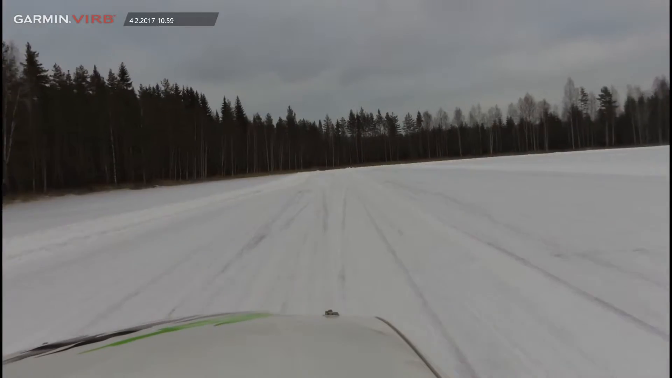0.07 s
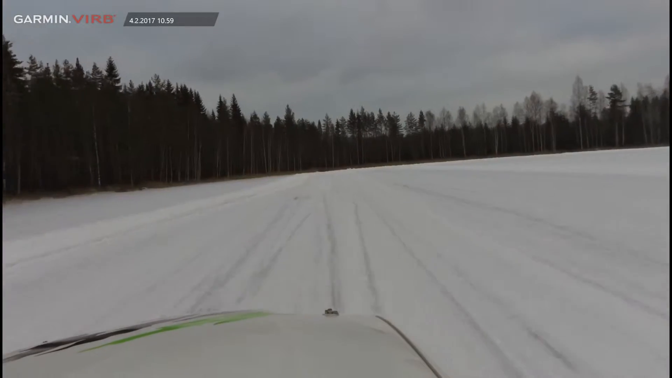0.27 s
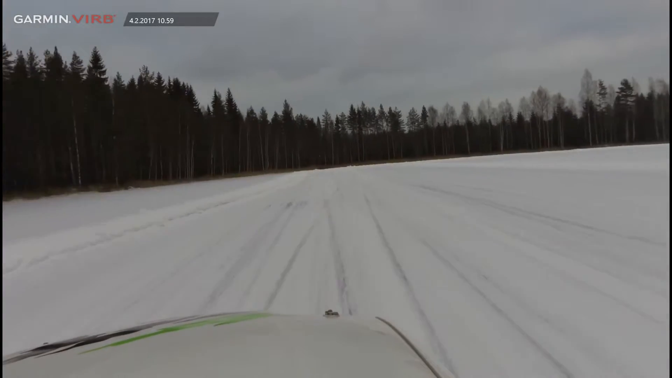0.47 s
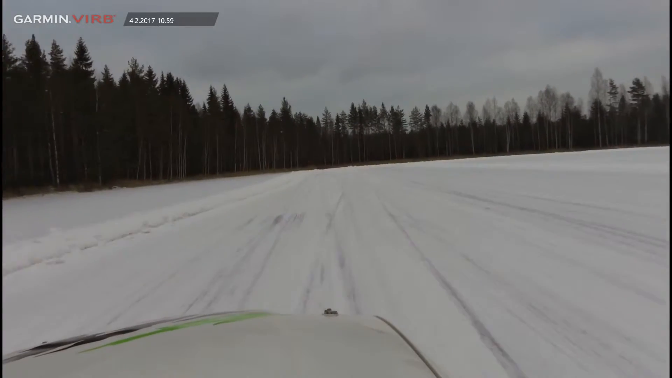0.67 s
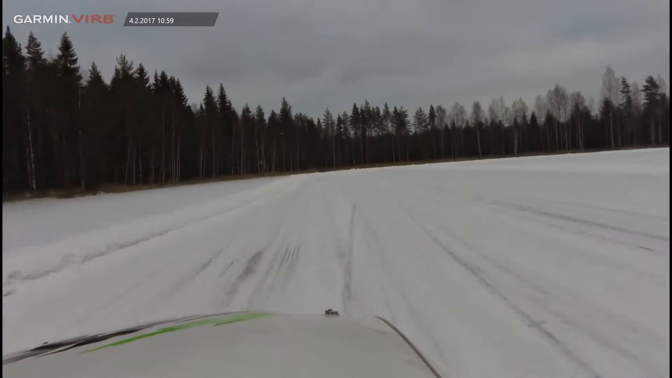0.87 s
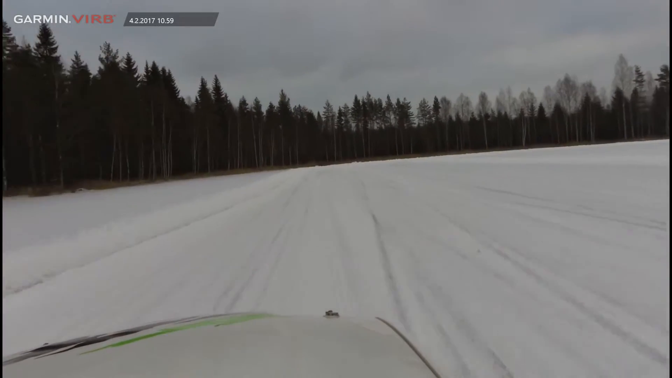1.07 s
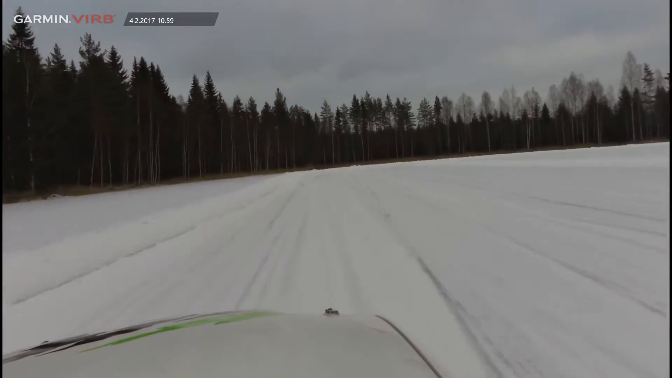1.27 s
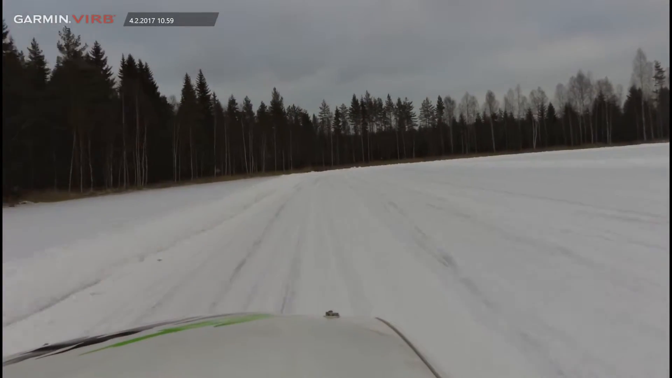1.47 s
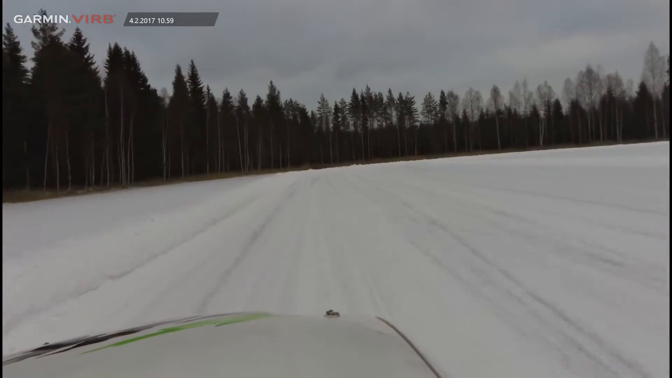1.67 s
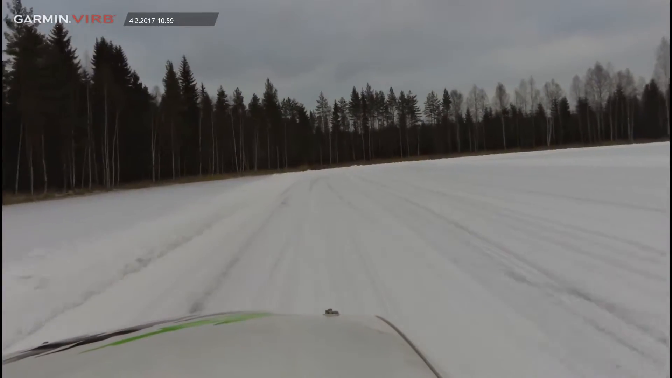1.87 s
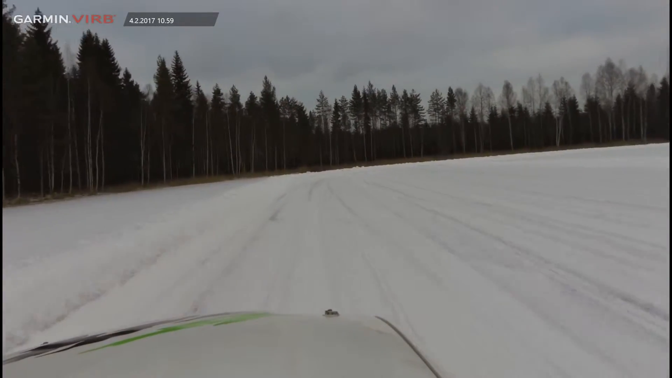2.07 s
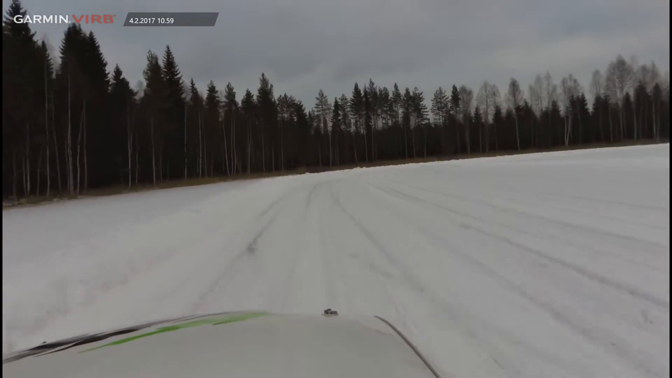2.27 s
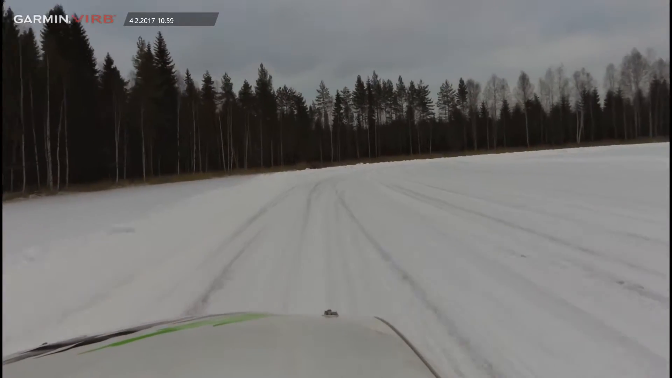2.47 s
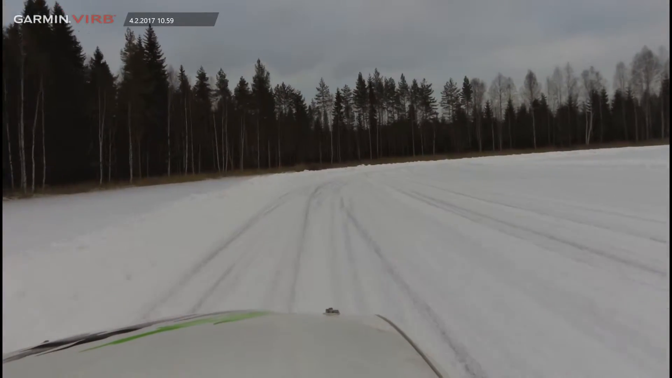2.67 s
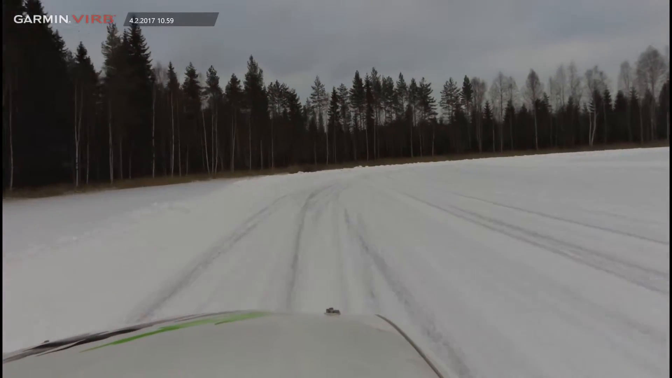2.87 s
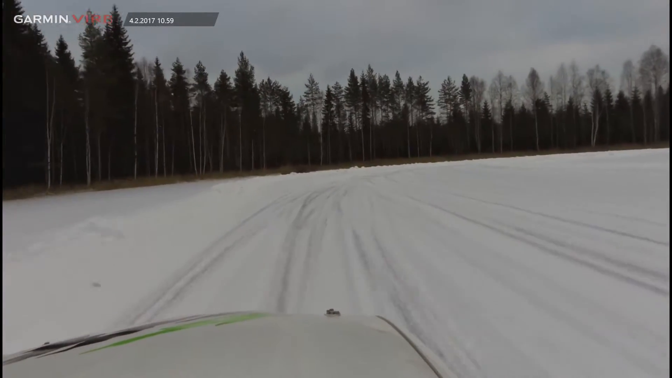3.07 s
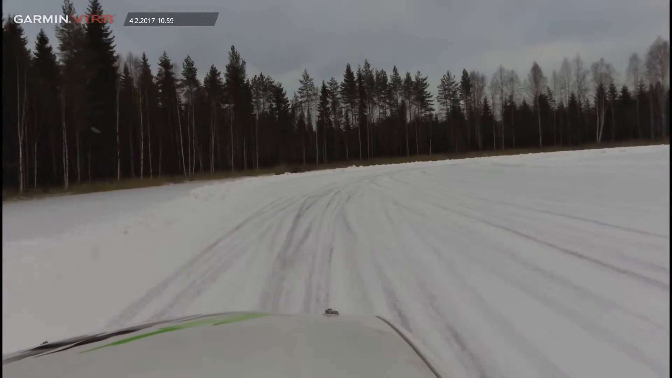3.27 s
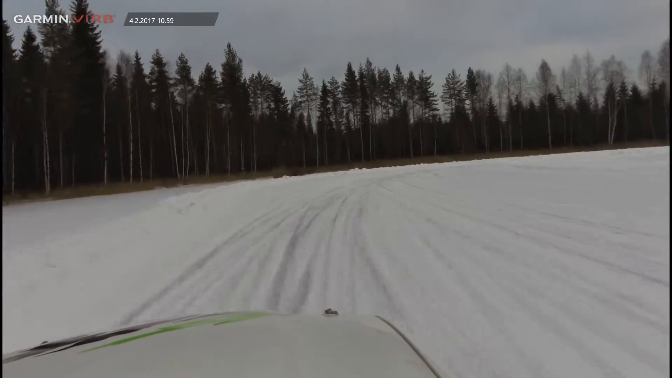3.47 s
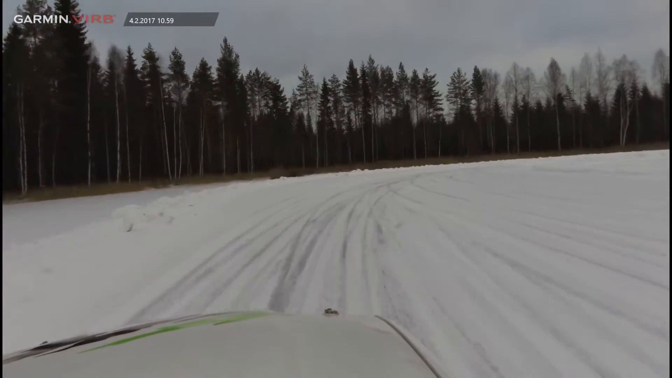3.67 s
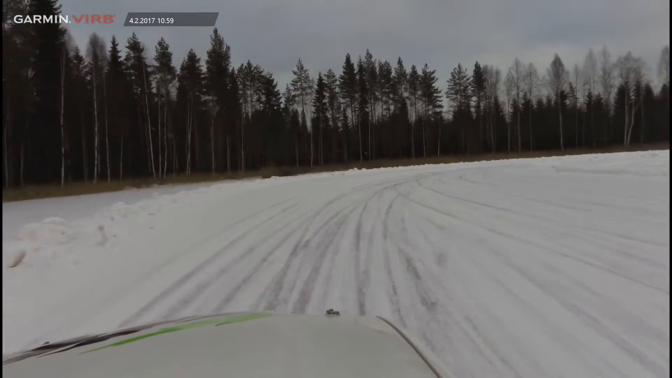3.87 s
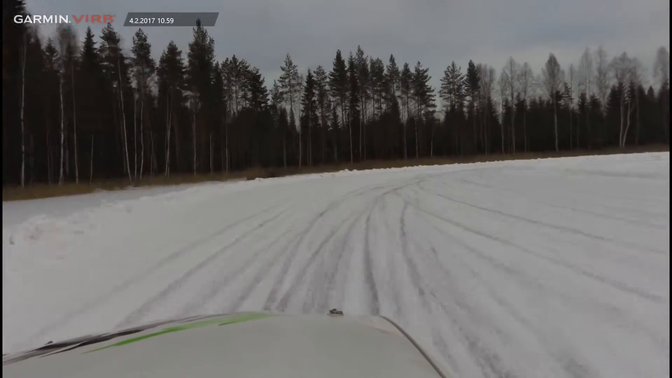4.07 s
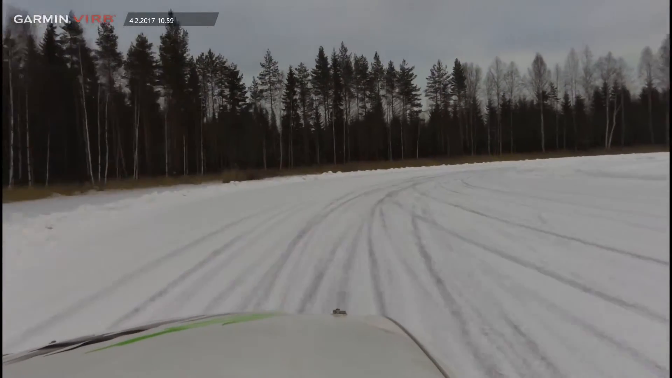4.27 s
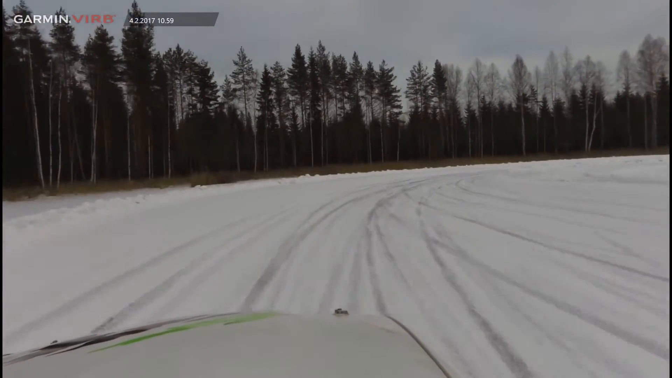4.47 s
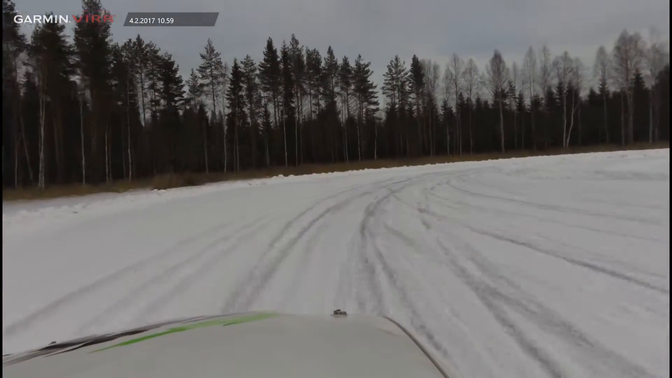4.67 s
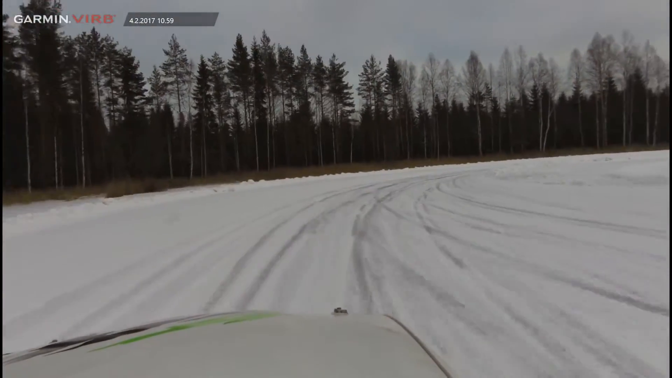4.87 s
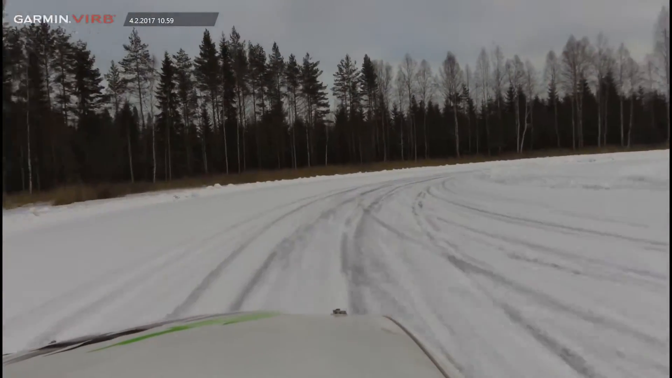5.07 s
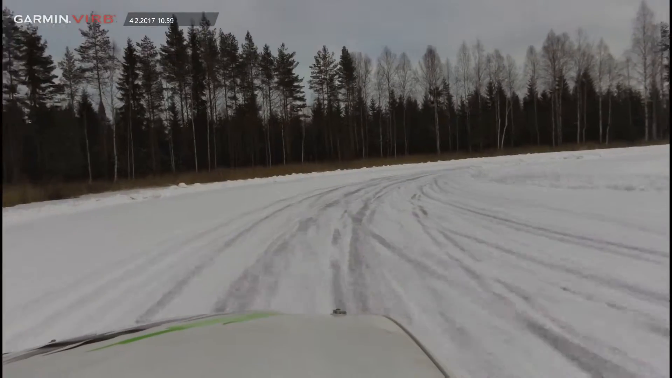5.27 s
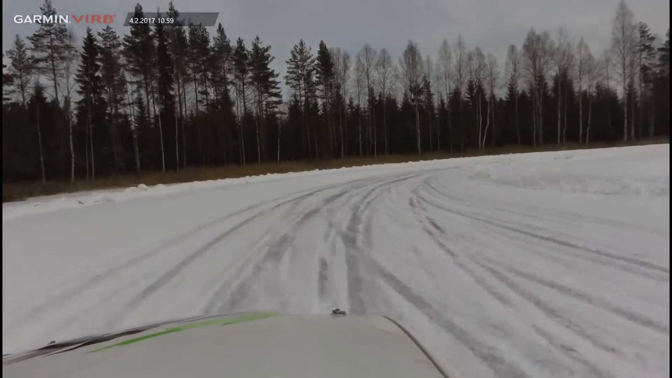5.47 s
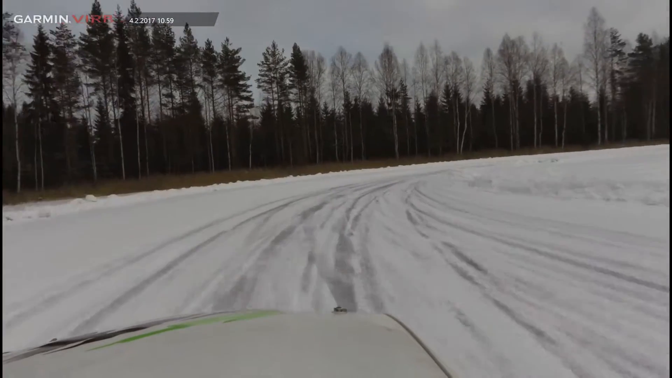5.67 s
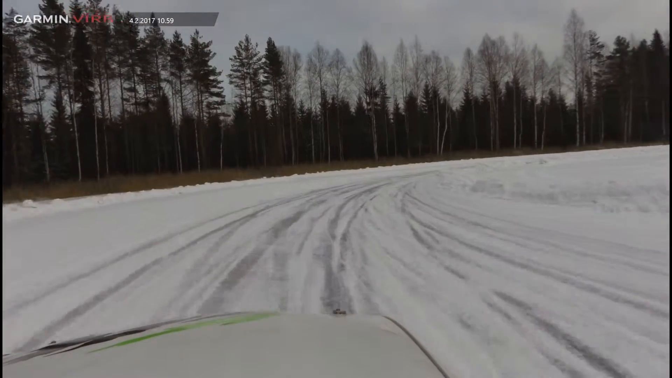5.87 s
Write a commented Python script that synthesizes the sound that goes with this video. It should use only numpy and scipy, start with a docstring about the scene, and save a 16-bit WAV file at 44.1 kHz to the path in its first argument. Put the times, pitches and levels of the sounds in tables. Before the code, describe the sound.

Overloaded wind roar batters a microphone on a fast-moving car, slowly sinking in pitch and strength as it slows, with fine snow ticks.

```python
"""A camera on the roof of a car driving fast along a snow track and easing off into a curve.
At first a full-speed roar: bands of noise, shaped like eddies, overload the microphone port. Fine snow
dust ticks throughout, and a thin hiss of noise rides along. At about half a second the wind dips briefly.
As the airspeed falls, the roar sinks in pitch, is less overloaded, and the hiss fades sooner. From about 2.6 s
louder ticks ring out as short crumbling noises: snow grains on the housing, and at 4.824 s a crackle of the
overloaded microphone, made in the same way. The car itself is not sounded."""
import sys
import numpy as np
from scipy import signal
from scipy.fft import rfft, irfft, next_fast_len
from scipy.io import wavfile
from scipy.ndimage import uniform_filter1d

SR = 44100
rng = np.random.default_rng(int(sys.argv[2]) if len(sys.argv) > 2 else 0)


def master_out(mix):
    """Clip the mix to full scale and print it as 16-bit PCM to the path in sys.argv[1]."""
    frames = np.transpose(np.atleast_2d(mix))
    ceiling = np.clip(frames, -1, 1)
    pcm = np.round(ceiling * 32767).astype(np.int16)
    wavfile.write(sys.argv[1], SR, pcm)


N = 261513
TIME = np.arange(N) / SR  # seconds

# the car holds its speed, then eases off into the curve: t/s, airspeed/share of full speed
AIRSPEED = [(0, 1), (.25, 1.03), (1.4, 1.001), (2.0, .96), (2.6, 0.87), (3.15, 0.82), (3.6, 0.75),
            (4.5, 0.69), (5.0, 0.72), (5.93, .63)]
# gusts press the stream onto the port (+) or leave it in the lee (-): t/s, length/s, level/dB
GUSTS = [(2.5, 0.11, 2.2), (3.62, .04, -2.1), (3.78, .045, -3), (3.97, 0.17, 1.1), (4.28, 0.055, -1.2),
         (4.82, .1, 2), (5.11, 0.14, -3)]
# the stream lifts off the port for an instant: t/s, length/s, level/dB
LULLS = [(0.459, 0.0044, -15.5), (3.353, 0.0048, -16)]
# eddy spectrum at full speed, only its shape matters: f/Hz, level/dB per Hz
EDDY_SPECTRUM = [(32, -28.5), (62, -4), (130, -1), (250, 0), (620, 1.5), (850, -2.5), (1200, -11),
                 (1700, -19), (2400, -29), (3500, -39.5), (5500, -57), (9000, -72.5)]
# short ticks: snow grains on the housing, and at 4.824 s a crackle of the overloaded microphone;
# before the common tick boost: t/s, peak level/dB
LOUD_TICKS = [(2.5905, -30), (2.6975, -23.5), (2.8823, -32), (3.277, -32), (3.9629, -38), (4.3814, -29.5),
              (4.824, -36), (5.074, -35.5), (5.1607, -35), (5.1834, -29.5), (5.5019, -36), (5.7945, -40),
              (5.908, -34)]
# rings of the housing, before each tick detunes and weights them: f/Hz, level/dB, time to fall 60 dB/s
HOUSING_RINGS = [(3160, -4.5, 0.0097), (3750, 6.5, 0.0041), (4140, -2.5, 0.0072), (4870, -5.5, 0.011),
                 (6000, -3, 0.0073), (7300, -10.5, .005)]
# hiss of the air past the housing, only its shape matters: f/Hz, level/dB per Hz
HISS_SPECTRUM = [(1000, -14.5), (2500, -2.5), (4000, -6), (6000, -14), (8500, -23), (12000, -33.5)]
# colour of the microphone behind its port: f/Hz, level/dB
PORT_COLOUR = [(100, -1.5), (1000, 1), (2200, 0), (3200, -1.5), (5000, -6.5), (8000, -9.5), (12000, -16.5)]

# buffeting pressure at full speed, before the port rounds it off, and the power of airspeed it follows
FULL_SPEED_DB, PRESSURE_POWER = -6, 2.58
# a gust brings larger, lower eddies; the lee leaves small, higher ones
GUST_OCTAVES_PER_DB = 0.03
# a tick at full speed rings most near TICK_HZ; at slower airspeed it sounds lower, by this power
TICK_HZ, TICK_PITCH_POWER = 5000, 0.6
TOP_HZ = 12400  # nearly nothing is heard above this


def undb(db):
    """Turn decibels into a gain."""
    return 10 ** (np.asarray(db) / 20)


def unit(x):
    """Scale to an rms (average strength) of 1."""
    return x / np.sqrt(np.mean(x ** 2))


def spectrum_db(points, hz):
    """Read a level off (Hz, dB) points, with frequency on a log scale as the ear hears it."""
    f, db = np.transpose(points)
    return np.interp(np.log(np.maximum(hz, 1)), np.log(f), db)


def walk(rate):
    """Smooth random wander of rms 1, with about `rate` changes a second."""
    hold = max(int(SR / rate), 2)
    steps = rng.standard_normal(N)[np.arange(N) // hold]
    return unit(uniform_filter1d(uniform_filter1d(steps, hold), hold))


def noise_bands(count=26):
    """Overlapping third-octave bands of noise, equal in power per Hz: (centre Hz, sound)."""
    size = next_fast_len(N, real=True)
    octaves = np.log2(np.maximum(np.fft.rfftfreq(size, 1 / SR), 1))
    for hz in 32 * 2 ** (np.arange(count) / 3):
        distance = np.clip(3 * (octaves - np.log2(hz)), -1, 1)
        window = np.cos(np.pi / 2 * distance)
        yield hz, irfft(window * rfft(rng.standard_normal(size)))[:N]


def colour(x, points):
    """Filter to the given (Hz, dB) shape, with no sound ahead of its cause."""
    size = 512
    cepstrum = irfft(np.log(undb(spectrum_db(points, np.fft.rfftfreq(size, 1 / SR)))))
    # folding the cepstrum (spectrum of the log spectrum) puts the whole response after time zero
    fold = np.r_[1, np.full(size // 2 - 1, 2), 1, np.zeros(size // 2 - 1)]
    response = irfft(np.exp(rfft(cepstrum * fold)))
    return signal.fftconvolve(x, response)[:N]


def airspeed(s):
    """Airspeed at the given times, as a share of full speed."""
    return np.interp(s, *np.transpose(AIRSPEED))


def swells(rows):
    """Level in dB of bell-shaped swells and dips, from (s, length s, dB) rows."""
    return sum(db * np.exp(-((TIME - at) / length) ** 2) for at, length, db in rows)


def buffeting(pressure_db, speed, flutter_db=0.5, flutter_rate=150, swerve=0.029, swerve_rate=200,
              burst_db=3.5, burst_rate=420, fine_hz=1600, vent_hz=140, wake_hz=260, wake_growth=0.42):
    """Eddies sweep over the port: faster air raises their pitch, and the small ones arrive in bursts."""
    # the local airspeed swerves from moment to moment, and pitch and pressure go with it
    local = np.exp(swerve * walk(swerve_rate))
    bursts = burst_db * walk(burst_rate)
    # the large eddies of the wake grow faster than the rest when the stream hits hard
    wake_db = wake_growth * (pressure_db - pressure_db.mean())
    roar, power = 0, 0
    for hz, band in noise_bands():
        fine = hz / (hz + fine_hz)  # share of the bursts, from 0 (low) towards 1 (high)
        large = np.exp(-(hz / wake_hz) ** 2)
        eddy_db = spectrum_db(EDDY_SPECTRUM, hz / (speed * local)) + large * wake_db
        # slow pressure changes leak away through the capsule's vent
        vent = hz / np.hypot(hz, vent_hz)
        gain = undb(eddy_db) * vent
        roar = roar + band * gain * undb(fine * bursts)
        power = power + hz * gain ** 2
    # the whole stream flutters as it tears off the housing
    flutter = undb(flutter_db * walk(flutter_rate))
    # dividing by the summed power leaves the loudness to pressure_db
    return unit(roar / np.sqrt(power) * local * flutter) * undb(pressure_db)


def overload(x, bias=-0.045):
    """The port passes small pressures cleanly and rounds large ones off, one side sooner than the other."""
    linear, ceiling = 0.34, 0.635
    pushed = x + bias
    clean, room = np.clip(pushed, -linear, linear), ceiling - linear
    return clean + room * np.tanh((pushed - clean) / room) - bias


def tick(centre_hz, focus=1.2, detune=0.019, crumble_s=0.00035):
    """A crumbling noise of a millisecond or two sets off the housing's rings, most near centre_hz; peak 1."""
    t = np.arange(SR // 40) / SR
    hz, db, t60 = np.transpose(HOUSING_RINGS)[:, :, None]
    hz = hz * (1 + detune * rng.standard_normal(hz.shape))
    weight = undb(db) * np.exp(-focus * np.abs(np.log2(hz / centre_hz)))
    rings = np.exp(-np.log(1000) * t / t60) * np.sin(2 * np.pi * hz * t)
    crumble = rng.standard_normal(rings.shape) * t * np.exp(-t / crumble_s)
    rings = signal.fftconvolve(rings, crumble, axes=1)[:, :len(t)]
    sound = (weight * rings / np.abs(rings).max(axis=1, keepdims=True)).sum(axis=0)
    # no sharp top, as from soft snow
    sound = signal.sosfilt(signal.butter(6, 7500, fs=SR, output="sos"), sound)
    return sound / np.abs(sound).max()


def ticks(boost_db=5, dust_db=-25, dust_range_db=22, dust_speed_power=4.0,
          after_db=-15, after_s=0.013, count=160):
    """Grains and the crackle, a weaker tick after each, and snow dust: mostly small, louder at speed."""
    # after a grain, the weaker tick is a chip of it that bounces
    after = [(s + after_s * rng.uniform(0.3, 1), db + after_db) for s, db in LOUD_TICKS]
    dust = []
    for s, small in rng.random((count, 2)) * [N / SR, 1]:
        speed_db = dust_speed_power * 20 * np.log10(airspeed(s))
        dust.append((s, dust_db - dust_range_db * np.sqrt(small) + speed_db))
    out = np.zeros(N + SR)  # a spare second leaves room for the last rings
    for s, peak_db in list(LOUD_TICKS) + after + dust:
        sound = tick(TICK_HZ * airspeed(s) ** TICK_PITCH_POWER)
        start = int(s * SR)
        out[start:start + len(sound)] += sound * undb(peak_db + boost_db)
    return out[:N]


def hiss(pressure_db, speed, hiss_db=-29, growth=1.94, speed_power=2.6, flicker_db=3.0, flicker_rate=350):
    """Fine hiss that needs fast air: it dies away much sooner than the roar."""
    noise = unit(colour(rng.standard_normal(N), HISS_SPECTRUM))
    level_db = hiss_db + growth * pressure_db + flicker_db * walk(flicker_rate)
    return noise * speed ** speed_power * undb(level_db)


def scene():
    """Airspeed and gusts set the pressure and pitch of the roar and the level of the hiss; ticks come through."""
    speed, gust_db, lull = airspeed(TIME), swells(GUSTS), undb(swells(LULLS))
    pressure_db = FULL_SPEED_DB + PRESSURE_POWER * 20 * np.log10(speed) + gust_db
    eddy_speed = speed * 2 ** (-GUST_OCTAVES_PER_DB * gust_db)
    roar = overload(buffeting(pressure_db, eddy_speed) * lull)
    return (roar + ticks() + hiss(pressure_db, speed) * lull)[None]


def record(dry):
    """The microphone dulls the top; its coupling tilts flattened crests, and the recorder clips overshoots."""
    sound = colour(dry[0], PORT_COLOUR)
    sound = signal.sosfilt(signal.butter(1, 32, "high", fs=SR, output="sos"), sound)
    sound = np.clip(sound, -0.74, 0.74)
    return signal.sosfilt(signal.ellip(8, 0.2, 70, TOP_HZ, fs=SR, output="sos"), sound)[None]


dry = scene()
out = record(dry)
master_out(out)
```